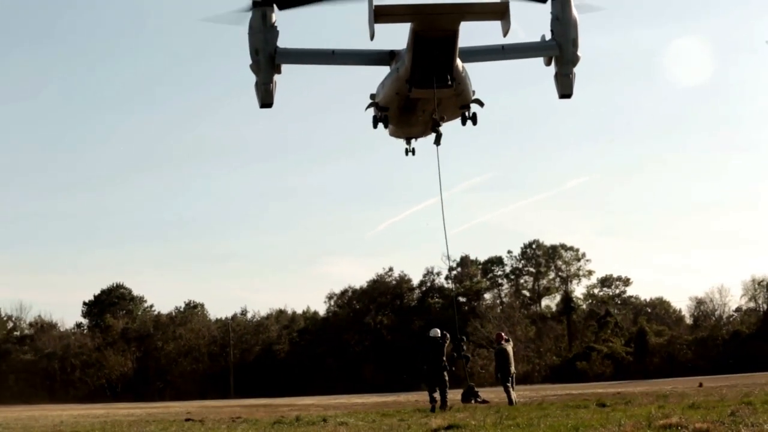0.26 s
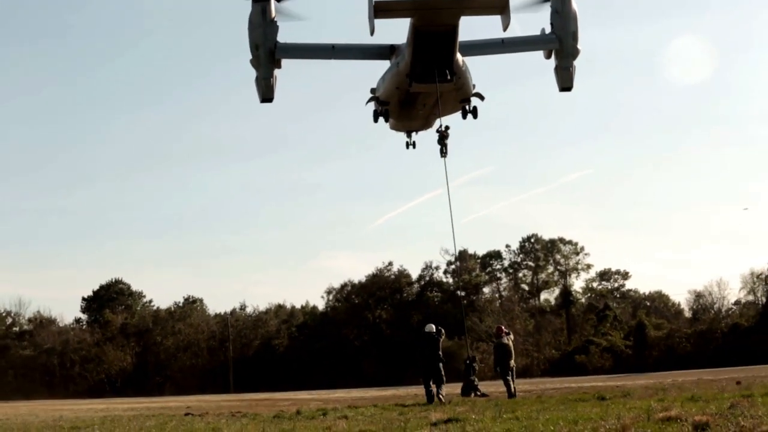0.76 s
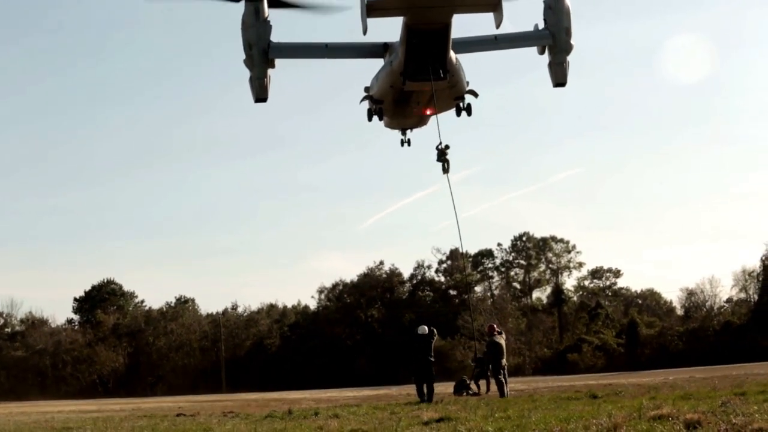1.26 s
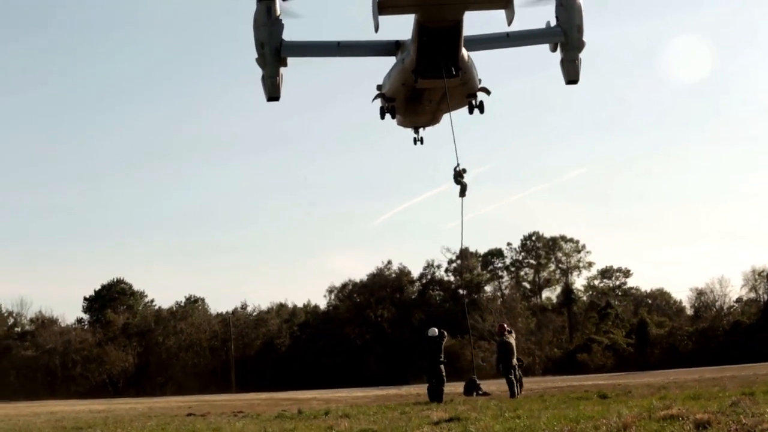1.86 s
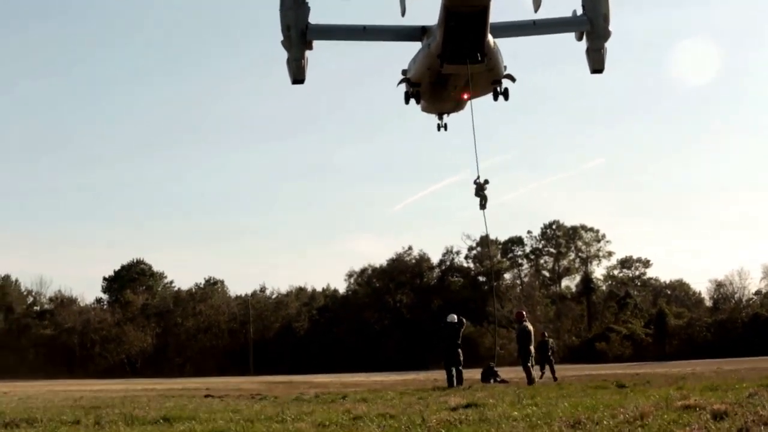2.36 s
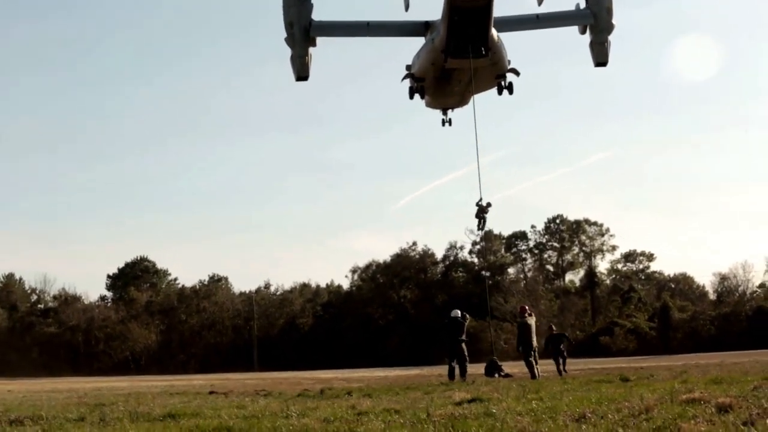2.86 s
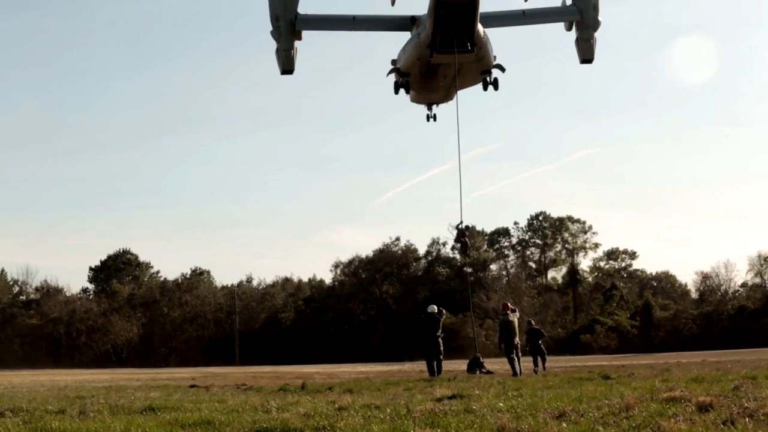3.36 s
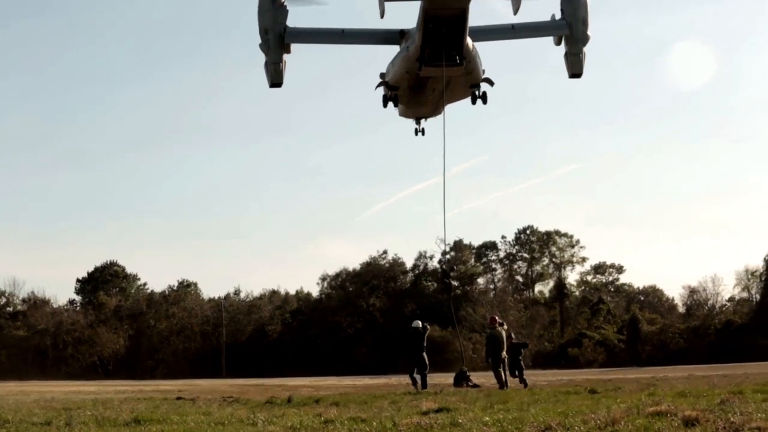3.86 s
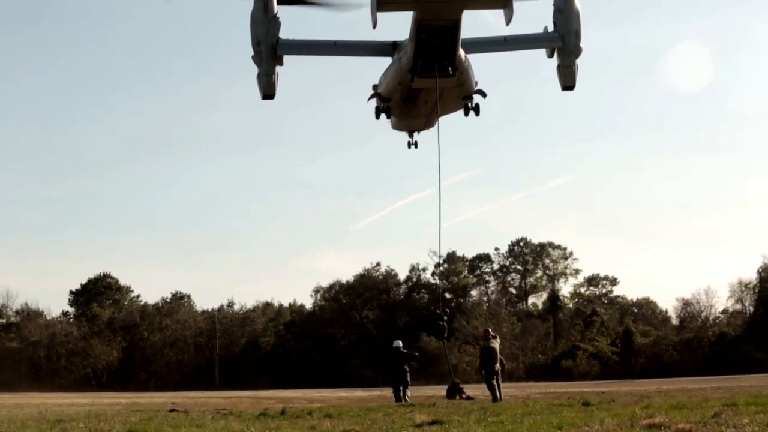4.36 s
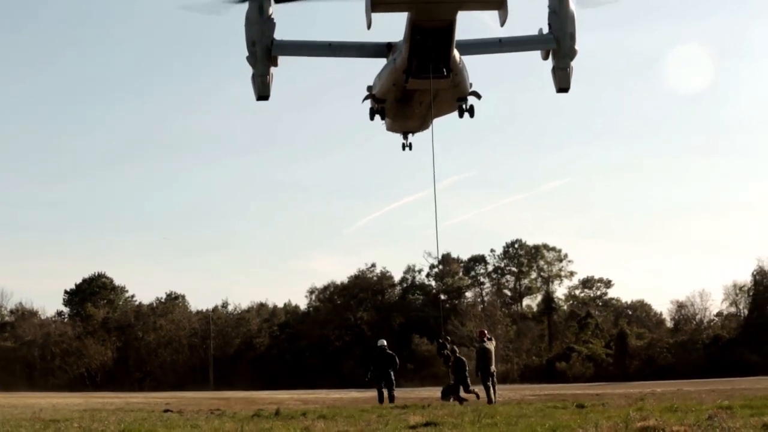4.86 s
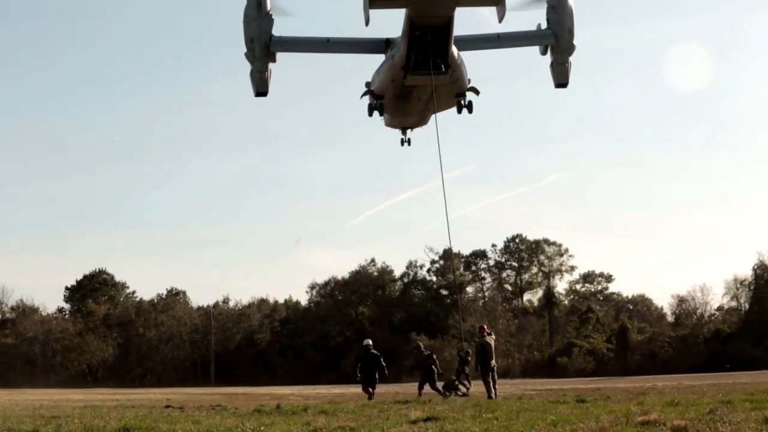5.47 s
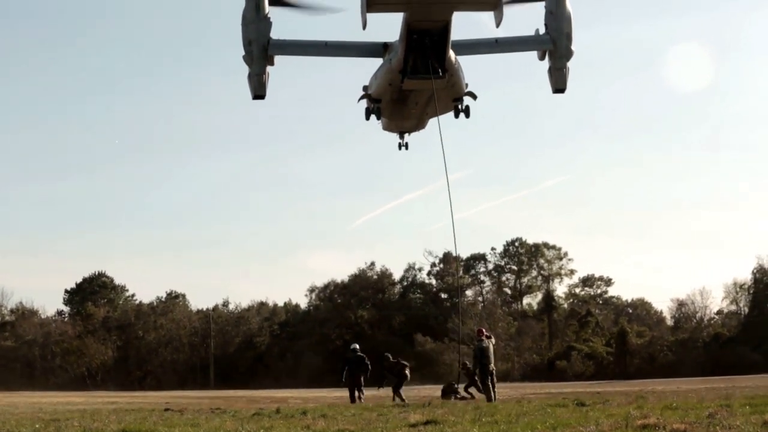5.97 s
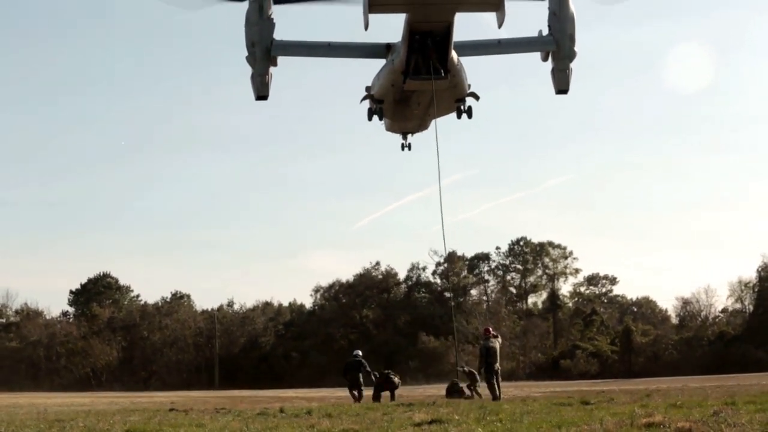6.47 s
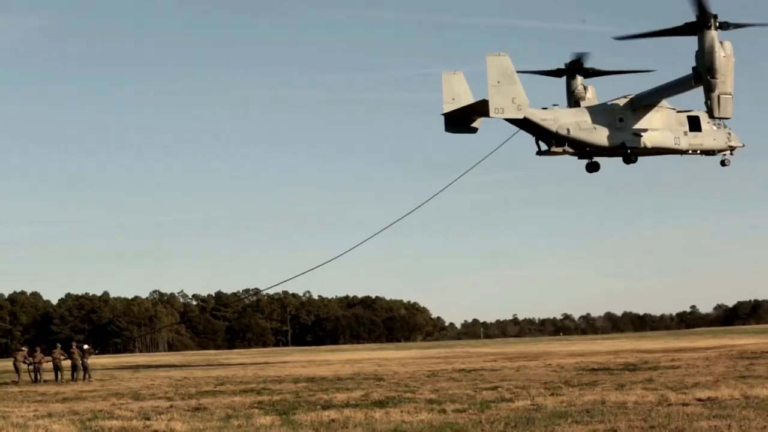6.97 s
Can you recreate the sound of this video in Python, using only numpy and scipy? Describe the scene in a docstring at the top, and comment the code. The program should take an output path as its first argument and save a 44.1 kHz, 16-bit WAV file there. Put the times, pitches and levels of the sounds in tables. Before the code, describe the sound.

A tiltrotor aircraft hovers low over an open field, heard from the ground behind it, loud and continuous for about seven seconds. From the start the rotors chop at roughly twenty beats a second, mixing deep thuds, hollow thumps and raspy slaps that swell in short runs. Under them the downwash roars in gusts and the turbines hiss. From 0.5 seconds some blades give sharp cracks, thickest between about 2.3 and 4.1 seconds and sparse afterwards. The rushing air eases around 3 seconds and builds again from about 5. Around 4 seconds a high compressor whine grows and then holds. Stronger thumps come between 6 and 6.6 seconds. At about 6.7 seconds the sound switches abruptly to the side of the aircraft: the low rumble jumps, the slaps lengthen, the whine recedes and a harder exhaust noise carries on to the end.

```python
"""A tiltrotor hovers low over a field, heard from the ground and at first from behind.
From the start the turbines hiss, the downwash roars, and each blade pushes the air and slaps through
the tip vortices of the blades before it. From 0.5 s some blades cut a vortex core and crack.
Around 4 s the compressor whine grows. At 6.67 s the aircraft is heard from the side:
the rumble jumps, the slaps lengthen and a harder exhaust band comes through."""
import sys
import numpy as np
from scipy import signal
from scipy.fft import rfft, irfft, next_fast_len
from scipy.io import wavfile
from scipy.ndimage import uniform_filter1d, map_coordinates

SR = 44100
rng = np.random.default_rng(int(sys.argv[2]) if len(sys.argv) > 2 else 0)


def transcribe(signal):
    """Save signal, clipped to [-1, 1], as a 16-bit WAV file at the path in sys.argv[1]."""
    frames = np.atleast_2d(signal).T
    limited = np.clip(frames, -1, 1)
    pcm = np.round(limited * 32767).astype(np.int16)
    wavfile.write(sys.argv[1], SR, pcm)


N = 318402
NOW = np.arange(N) / SR
PULSE_TIME = np.arange(-2048, 2048) / SR  # seconds about the middle of one pulse
BLADE_HZ = 20.54  # blade-passage frequency
SIDE_S = 6.665  # heard from the side after this time
ROAR_DB, ROAR_GROWS = -34.5, 0.98  # level in average flow; dB gained per dB of churn

# How deep the blades dip into the wake: (time [s], level [dB])
WAKE = [(0.04, -31), (0.42, -27.5), (0.62, -34.5), (0.72, -31.5), (1.1, -31.5), (1.22, -35), (1.65, -33.5),
        (1.89, -44), (1.98, -26.5), (2.22, -28.5), (2.4, -35.5), (2.55, -33), (2.9, -39), (3.15, -40.5),
        (3.45, -37), (3.6, -36), (3.68, -34.5), (3.77, -39), (4.03, -43.5), (4.22, -37), (4.55, -40),
        (4.95, -31), (5.29, -38.5), (5.55, -34.5), (5.95, -35.5), (6.07, -33.5), (7.19, -41.5)]
# How hard the churned air blows toward the listener: (time [s], level [dB])
CHURN = [(0.04, -33.5), (0.28, -32), (0.5, -33), (0.78, -39), (1.01, -43.5), (1.5, -39.5), (1.79, -42.5),
         (2.0, -39.5), (2.25, -37), (2.36, -43), (2.66, -39.5), (2.8, -45), (3.05, -47), (3.22, -42.5),
         (3.36, -47), (3.93, -41.5), (4.06, -45.5), (4.22, -38.5), (4.68, -41), (5.0, -36.5), (5.3, -38),
         (5.6, -36.5), (5.98, -35), (6.18, -38.5), (6.36, -35), (6.55, -39), (6.75, -39.5), (7.19, -41.5)]
# Blades that cut a vortex core: (time [s], edge level [dB], body level [dB])
CRACKS = [(0.4763, -52, -47), (0.7161, -59, -37), (0.9595, -64, -34.5), (1.0115, -72, -35),
          (1.1056, -46.5, -43), (1.1556, -54, -41), (1.3522, -72, -33), (1.5457, -74, -36),
          (1.5925, -51, -32.5), (1.6897, -46, -45), (1.9804, -68, -34), (2.2727, -63, -27.5),
          (2.3215, -70, -34), (2.3702, -70, -35), (2.566, -52, -34), (2.6129, -69, -30),
          (2.6625, -68, -29.5), (2.7114, -71, -31), (2.7601, -75, -33.5), (2.8092, -65, -35),
          (2.8568, -49, -30.5), (2.9087, -59, -41), (2.9524, -55, -33), (3.1021, -51, -33.5),
          (3.1984, -51, -31.5), (3.2477, -68, -34.5), (3.296, -57, -37), (3.3444, -73, -33.5),
          (3.4908, -63, -34), (3.6395, -70, -37), (3.688, -59, -46), (3.8797, -66, -35),
          (3.9289, -48.5, -32), (3.9775, -45.5, -32), (4.026, -45, -30.5), (4.124, -54, -34),
          (4.3701, -68, -39), (4.6136, -62, -36), (4.8558, -50, -32.5), (6.4625, -65, -31)]
# Spectrum of a steep pressure edge: (frequency [Hz], level [dB])
EDGE_SPECTRUM = [(1500, 3), (4500, 8), (7000, -0.5), (11000, -9.5), (15000, -24)]


def amp(db):
    return 10 ** (np.asarray(db) / 20)


def unit(x):
    """Every row at rms 1."""
    return x / np.sqrt(np.mean(x ** 2, axis=-1, keepdims=True) + 1e-20)


def curves(rows, at):
    """Linear interpolation of each column after the time."""
    times, *columns = np.transpose(rows)
    return [np.interp(at, times, column) for column in columns]


def swing(rows, at):
    """Deviation of a level curve from its time average, in dB."""
    return curves(rows, at)[0] - curves(rows, NOW)[0].mean()


def swells(rows, at):
    """Superposed Gaussian bells, one per (time, width at half height, peak values...) row."""
    times, widths, *columns = np.transpose(rows)
    bells = .5 ** ((2 * (at[:, None] - times) / widths) ** 2)
    return [bells @ column for column in columns]


def wobble(rate):
    """A smooth random curve, rate knots a second."""
    return map_coordinates(rng.standard_normal(int(N * rate / SR) + 4), [NOW * rate])


def from_side(at):
    """Directivity switch: 0 from behind, 1 from the side."""
    return 1. * (at > SIDE_S)


def side_ease(at, db_per_s=1):
    """Exponential decay: dB lost since the aircraft was first heard from the side."""
    return db_per_s * np.maximum(at - SIDE_S, 0)


def coloured(x, spectrum, stretch=1):
    """Zero-phase filtering of each row; stretch scales the spectrum's frequencies."""
    n = x.shape[-1]
    size = next_fast_len(n)
    knots_hz, knots_db = np.transpose(spectrum)
    hz = np.fft.rfftfreq(size, 1 / SR) / stretch
    gain = amp(np.interp(np.log(hz + 1), np.log(knots_hz), knots_db))
    return irfft(rfft(x, size) * gain, size)[..., :n]


def turbulence(spectrum, patchy_db):
    """Turbulent noise of rms 1, its gain varying in random patches of time and frequency."""
    bins = signal.stft(rng.standard_normal(N), nperseg=512)[2]
    patches = uniform_filter1d(rng.standard_normal(bins.shape), size=4, axis=0)
    patches = uniform_filter1d(patches, size=12, axis=1)
    noise = signal.istft(bins * amp(patchy_db * patches / patches.std()), nperseg=512)[1][:N]
    return unit(coloured(noise, spectrum))


def bursts(times, spectrum, rise, fall, scatter, memory, tail_db, tail, stretch=1):
    """One pressure spike per blade in a cloud of eddies; memory correlates successive clouds."""
    t = PULSE_TIME
    noise = rng.standard_normal((len(times), len(t)))
    eddies = unit(signal.lfilter([1], [1, -memory], noise, axis=0))
    crossing = np.exp(-np.abs(t) / np.where(t < 0, rise, fall))
    scattered = amp(tail_db) * (t > 0) * np.exp(-np.abs(t) / tail)  # from ground and trees
    cloud = unit(coloured(eddies * (crossing + scattered), spectrum, stretch))
    spike = unit(coloured(1. * (t == 0), spectrum, stretch))
    return unit(spike + scatter * cloud)


def train(pulses, times, level_db, uneven_db):
    """Superposed pulses; level_db is the mean over a blade period, uneven_db its random spread."""
    duty = SR / BLADE_HZ / len(PULSE_TIME)
    gain = amp(level_db + uneven_db * rng.standard_normal(len(times))) * np.sqrt(duty)
    index = np.round((times[:, None] + PULSE_TIME) * SR).astype(int)
    inside = (index >= 0) & (index < N)
    return np.bincount(index[inside], (pulses * gain[:, None])[inside], N)


def ground_reflection(x):
    """Comb filtering: a soft, inverted reflection off the grass interferes with the direct sound."""
    # Reflected path: (time [s], delay [s], amplitude weight [ratio])
    path = [(0.3, 0.0024, 0.8), (1.3, 0.0021, 0.095), (2.7, 0.0021, 0.59), (4.5, 0.0015, 0.12),
            (5.5, 0.00198, 0.93), (6.62, 0.0017, 0.44), (6.7, 0.0014, 0.087)]
    # What the grass sends back: (frequency [Hz], gain [dB])
    grass = [(200, -14), (420, -10), (1100, -6), (1500, -44), (2100, -16), (3000, -30)]
    delay, share = curves(path, NOW)
    bounce = np.interp(NOW - delay, NOW, coloured(x, grass))
    return (x - share * bounce) / np.sqrt(1 + share ** 2)


def turbines():
    """Jet noise hisses through churning air, compressors whine; one exhaust band radiates sideways."""
    # Low, middle and high jet bands, side exhaust and whine: (frequency [Hz], level [dB])
    rush_spectrum = [(1200, -5), (2000, -1.5), (2400, 3), (2900, -1), (3300, -5), (4000, -13.5),
                     (6000, -29), (12000, -120)]
    hiss_spectrum = [(2500, -15), (3600, 0.5), (4050, 0), (4500, 2.5), (4850, 0), (5300, -1), (5800, -3),
                     (6400, -3.5), (7400, -7), (8000, -13), (10000, -27), (15000, -70)]
    fizz_spectrum = [(5000, -40), (7800, 0), (9000, 2), (10500, -3), (12000, -7.5), (13500, -14),
                     (15000, -17)]
    exhaust_spectrum = [(800, -22), (1080, 5), (1450, -26), (1740, -10), (1900, 9.5), (2150, -2),
                        (2600, -8), (3300, -5.5), (3600, -2.5), (3900, -3), (4250, -22), (5100, -16),
                        (5700, -28), (6200, -16), (6650, -21), (7100, -16), (8000, -26), (12000, -48)]
    whine_spectrum = [(4300, -30), (4620, -7), (4850, 0), (5050, -5), (5300, -30), (5900, -22),
                      (6400, -7.5), (6900, -24), (9000, -70)]
    # Compressor whine: (time [s], level [dB])
    whine_level = [(3.9, -67), (4.4, -58), (5.2, -55.5), (6.6, -55.5), (6.7, -64)]
    # Swells of the treble: (time [s], width [s], hiss gain [dB], fizz gain [dB])
    hiss_swells = [(.08, 0.28, 0.5, 0), (.36, 0.78, 3, 1), (.55, 0.21, 1, 0.5), (1.75, 0.49, 1, -3),
                   (2.0, 0.18, 3.5, 2.5), (2.22, 0.14, 3.5, 4.5), (5.5, 0.92, 0.5, 2.5),
                   (5.95, 0.24, 2, 3.5), (6.35, 0.21, 1, 2), (6.85, .17, 1, 3)]
    # Swell of the side exhaust: (time [s], width [s], gain [dB])
    exhaust_swell = [(6.84, 0.25, 6)]
    churn_db, side = swing(CHURN, NOW), from_side(NOW)
    hiss_gain_db, fizz_gain_db = swells(hiss_swells, NOW)
    exhaust_db = -40.5 + swells(exhaust_swell, NOW)[0] - side_ease(NOW)
    hiss_db = -51 + .7 * churn_db + hiss_gain_db + .5 * side
    fizz_db = -64.5 + .63 * churn_db + fizz_gain_db - 4.5 * side
    exhaust = amp(exhaust_db) * side * turbulence(exhaust_spectrum, patchy_db=.6)
    rush = amp(-41 + .86 * churn_db) * turbulence(rush_spectrum, patchy_db=1)
    hiss = amp(hiss_db) * turbulence(hiss_spectrum, patchy_db=.5)
    fizz = amp(fizz_db) * turbulence(fizz_spectrum, patchy_db=1.2)
    whine = amp(curves(whine_level, NOW)[0]) * turbulence(whine_spectrum, patchy_db=0)
    flutter = amp(.6 * wobble(12) + .6 * wobble(90))
    return (rush + hiss + fizz + whine + exhaust) * flutter


def downwash():
    """Turbulent flow noise: the rotor wake rumbles and roars, amplitude-modulated by gusts."""
    # Low and middle bands of the flow: (frequency [Hz], level [dB])
    rumble_spectrum = [(15, -32), (50, -24), (90, -11), (140, -6), (220, -0.5), (310, -2.5), (365, -6),
                       (450, -8), (800, -13.5), (4000, -120)]
    roar_spectrum = [(200, -39), (460, -10.5), (620, -2), (790, -1), (1000, -4.5), (1180, -1.5),
                     (1650, -2.5), (2050, -9.5), (2700, -27), (4200, -49), (12000, -120)]
    side, gust = from_side(NOW), wobble(11)
    rumble_db = -41.5 + swing(WAKE, NOW) + 14.5 * side - side_ease(NOW)
    roar_db = ROAR_DB + ROAR_GROWS * swing(CHURN, NOW) - .5 * side
    rumble = amp(rumble_db + .5 * gust) * turbulence(rumble_spectrum, patchy_db=3)
    roar = amp(roar_db + .27 * gust) * turbulence(roar_spectrum, patchy_db=1.75)
    return ground_reflection(rumble + roar)


def blade_push(times):
    """Loading noise: the steady force of each blade on the air radiates a smooth, low pulse."""
    # Loading pulse: (frequency [Hz], level [dB])
    spectrum = [(12, -38), (24, -14), (41, -2.5), (62, 4.5), (82, 6), (105, 3.5), (150, -5), (600, -120)]
    # Air load on the blades: (time [s], level [dB])
    load = [(0.1, -43.5), (0.32, -45), (1.01, -51.5), (2.0, -48.5), (2.77, -49), (2.79, -55.5), (5.16, -45),
            (7.2, -47)]
    push = -unit(coloured(1. * (PULSE_TIME == 0), spectrum))
    return train(push, times, -45 + 1.2 * swing(load, times), uneven_db=1.7)


def wake_thud(times):
    """Blade-wake interaction: the deeper a blade dips into the wake, the louder it thuds."""
    # Deep thud: (frequency [Hz], level [dB])
    spectrum = [(30, -68), (75, -30), (103, -11.5), (125, -3.5), (155, -1.5), (190, -5), (270, -32),
                (900, -120)]
    thud = bursts(times, spectrum, rise=.0042, fall=.0065, scatter=.9, memory=.88,
                  tail_db=-20, tail=.016)
    return train(thud, times + .0015, -40 + 1.21 * swing(WAKE, times), uneven_db=1.55)


def vortex_thump(times, wander, centre_hz=240):
    """Unsteady loading: a blade passing close over a vortex gives a hollow thump."""
    # Hollow thump: (frequency [Hz], level [dB])
    spectrum = [(60, -70), (145, -25), (172, -13), (195, -3.5), (235, 0), (290, -2), (320, -13), (350, -27),
                (405, -21), (500, -32), (800, -60), (2000, -120)]
    # Close passes: (time [s], width [s], gain [dB], centre shift [Hz])
    close_passes = [(.3, 0.5, 0.5, 3), (.68, 0.15, 3.5, 29), (.44, 0.11, -2, -6), (1.0, 0.12, 6.5, -19),
                    (1.16, 0.041, -2, 2), (1.37, 0.25, 2.5, 21), (1.56, 0.081, 5, -11), (1.8, 0.096, 2, 4),
                    (2.03, 0.17, 8, -13), (2.23, 0.058, 5, -8), (2.6, 0.27, 5.5, -3),
                    (2.96, 0.045, 3.5, -2), (3.35, 0.045, -11, 0), (3.45, 0.057, 6.5, 3),
                    (3.68, 0.14, 6, -13), (4.03, 0.068, 5, -10), (4.22, 0.061, 5.5, 17),
                    (5.2, 0.039, 3.5, -8), (6.04, 0.078, 8.5, 32), (6.12, .04, 9.5, -4),
                    (6.45, 0.17, 9, -4), (6.59, 0.054, 10.5, -11), (6.9, 0.031, 7.5, 1)]
    gain_db, shift_hz = swells(close_passes, times)
    stretch = (1 + shift_hz / centre_hz) * np.exp(.057 * rng.standard_normal(len(times)))
    thump = bursts(times, spectrum, rise=.0038, fall=.0046, scatter=1.4, memory=.6,
                   tail_db=-22, tail=.014, stretch=stretch[:, None])
    return train(thump, times + .0015 + .00046 * wander, -34 + gain_db, uneven_db=1.5)


def core_cracks():
    """Impulsive noise: cutting a vortex core sends out a steep pressure drop, then a short spatter."""
    # Body of the crack: (frequency [Hz], level [dB])
    body_spectrum = [(200, -12), (480, -6), (750, 9.5), (1000, 7), (1200, 11), (1750, 8.5), (2250, -2),
                     (3100, -7.5), (4200, -22), (8000, -50), (16000, -90)]
    times, edge_db, body_db = np.transpose(CRACKS)
    edge = bursts(times, EDGE_SPECTRUM, rise=.0001, fall=.0013, scatter=1.5, memory=0,
                  tail_db=-17, tail=.008)
    body = bursts(times, body_spectrum, rise=.0007, fall=.0023, scatter=1.6, memory=0,
                  tail_db=-20, tail=.006)
    return ground_reflection(-train(edge, times, edge_db, uneven_db=.5)
                             - train(body, times, body_db, uneven_db=.5))


def blade_slap(times, wander, base_db=-34.5, centre_hz=770):
    """Blade-vortex interaction: crossing a tip vortex gives a slap, a rasp and a faint bright edge."""
    # Slap and rasp: (frequency [Hz], level [dB])
    slap_spectrum = [(250, -63), (370, -19.5), (425, -15), (505, -12.5), (590, -6.5), (660, -0.5), (790, 1),
                     (900, -1.5), (1010, -24.5), (1500, -29), (4000, -120)]
    rasp_spectrum = [(200, -34), (355, -0.5), (405, 1), (450, 2.5), (520, -16.5), (900, -3), (1010, -2.5),
                     (1110, -0.5), (1400, -4), (1800, -3.5), (2150, -10), (2700, -12.5), (4000, -25),
                     (4800, -25.5), (16000, -63)]
    # Runs of slaps as a tip vortex drifts through the rotor:
    # (time [s], width [s], slap gain [dB], rasp gain [dB], centre shift [Hz])
    runs = [(.09, 0.048, 6, -3, 0), (.67, .04, 2, -1, 5), (.72, 0.29, 5.5, 6, 3), (.95, 0.14, 8, 3.5, -73),
            (1.16, 0.058, 7, 6, -30), (1.24, 0.14, -1, -1, 0), (1.37, 0.099, 8.5, -4, -33),
            (1.56, 0.085, 9, 8, -12), (1.69, 0.05, 8.5, 6.5, -28), (1.78, 0.057, 7, -2, -35),
            (1.99, 0.04, 5.5, -3, -50), (2.27, 0.044, 2.5, 1.5, 2), (2.33, 0.14, 9, 1, 2),
            (2.64, 0.23, 6, 3.5, -28), (2.77, 0.12, 9, 1.5, -1), (2.94, 0.07, 8, 9.5, -16),
            (3.2, 0.23, 5, 3, -10), (3.31, 0.051, 6.5, 7.5, 12), (3.39, 0.034, -6, -1.5, 0),
            (3.45, 0.077, 5, -0.5, -14), (3.59, 0.15, 6.5, 4, -65), (3.92, 0.23, 2.5, 5.5, 54),
            (4.26, 0.088, 7.5, 2, -29), (4.37, 0.068, 4.5, 8, 0), (4.48, 0.058, 9.5, 1.5, 23),
            (4.58, 0.12, 8, 3, 14), (4.71, 0.027, 5, 0, 0), (5.05, 0.086, 6.5, 2, -17),
            (5.22, 0.064, 9, 2, -27), (5.53, 0.12, 4, 2, 27), (5.78, 0.38, 3, 1, 48),
            (5.99, 0.066, 5, 2, 5), (6.1, 0.089, 11.5, 0, -12), (6.46, 0.092, 7, -1.5, -81),
            (6.7, 0.14, -2.5, 1.5, 0), (6.8, 0.041, -3, 4, 0), (6.92, 0.13, 3, 5.5, 40),
            (7.05, 0.071, 6.5, 6, -7), (7.13, 0.045, 0, 4.5, 4)]
    churn_db, side = swing(CHURN, times), from_side(times)
    slap_gain_db, rasp_gain_db, shift_hz = swells(runs, times)
    rasp_db = base_db + .67 * churn_db + rasp_gain_db + 1.5 * side
    edge_db = -70.5 + .6 * (rasp_db - base_db)
    sharpness = rng.standard_normal(len(times))
    slap_stretch = (1 + shift_hz / centre_hz) * np.exp(.012 * sharpness)
    rasp_stretch = 1.015 * 1.01 ** side * np.exp(.043 * sharpness)
    # Bursts lengthen in churned air and from the side; hard slaps are shorter.
    smear = np.clip(amp(.25 * (ROAR_DB + ROAR_GROWS * churn_db - rasp_db)), .75, 1.3)
    spread = (smear * 2.1 ** side * np.exp(-.036 * slap_gain_db))[:, None]
    slap = bursts(times, slap_spectrum, rise=.004 * spread, fall=.0036 * spread, scatter=1.6,
                  memory=.4, tail_db=-18, tail=.018, stretch=slap_stretch[:, None])
    rasp = bursts(times, rasp_spectrum, rise=.005 * spread ** .5, fall=.0053 * spread ** .5,
                  scatter=5.2, memory=.3, tail_db=-16, tail=.015, stretch=rasp_stretch[:, None])
    edge = bursts(times, EDGE_SPECTRUM, rise=.001, fall=.004, scatter=3, memory=0,
                  tail_db=-15, tail=.008)
    # A blade that cracks cleanly rasps 2 dB less.
    cracking = np.abs(times[:, None] - np.transpose(CRACKS)[0]).min(axis=1) < .5 / BLADE_HZ
    slaps = train(slap, times + .00024 * wander, base_db + slap_gain_db, uneven_db=0)
    rasps = train(rasp, times - .0006 + .0003 * wander, rasp_db - 2 * cracking, uneven_db=1.5)
    edges = train(edge, times - .001, edge_db, uneven_db=3.5)
    return slaps + ground_reflection(rasps) - edges


def rotors():
    """Rotor noise repeats at the blade-passage frequency; wandering vortices jitter its timing."""
    # Arrival of the slap within its blade period: (time [s], delay [s])
    arrival = [(0.04, 0.037), (0.52, 0.0344), (1.3, 0.036), (1.74, 0.0352), (2.32, 0.0342), (3.49, 0.0354),
               (3.64, 0.0341), (4.12, 0.0349), (4.32, 0.0382), (5.24, 0.0356), (6.22, 0.0365),
               (6.66, 0.0352), (6.7, 0.0288), (7.19, 0.0335)]
    beats = np.arange(int(N / SR * BLADE_HZ)) / BLADE_HZ
    times = beats + curves(arrival, beats)[0]
    wander = rng.standard_normal(len(times))
    return blade_push(times) + wake_thud(times) + vortex_thump(times, wander) + blade_slap(times, wander)


def scene():
    """Superposition of the aircraft's sources, in mono."""
    return (turbines() + downwash() + core_cracks() + rotors())[None]


def record(dry):
    """Band limiting: an ideal low-pass filter removes the highest treble."""
    top_hz = 15250
    size = next_fast_len(N + SR // 2)
    passband = np.fft.rfftfreq(size, 1 / SR) < top_hz
    return irfft(rfft(dry, size) * passband, size)[..., :N]


dry = scene()
out = record(dry)
transcribe(out)
```